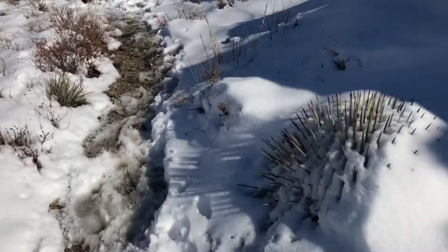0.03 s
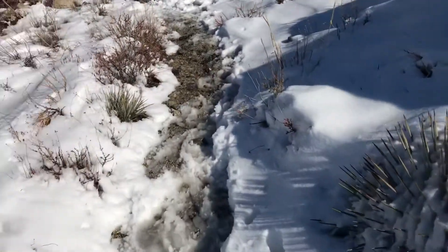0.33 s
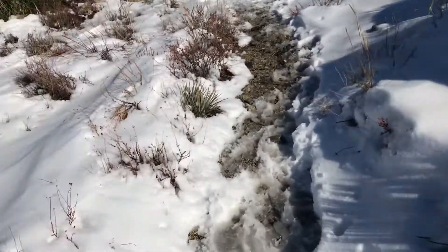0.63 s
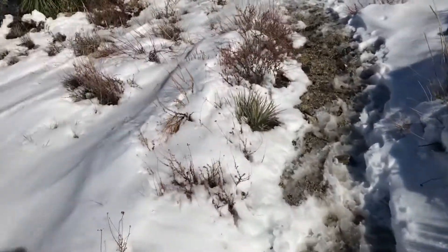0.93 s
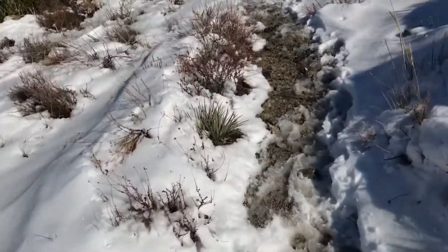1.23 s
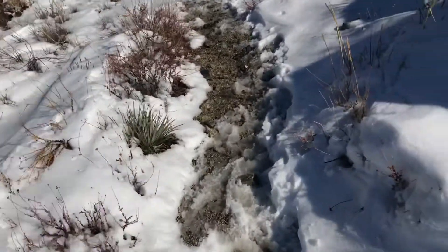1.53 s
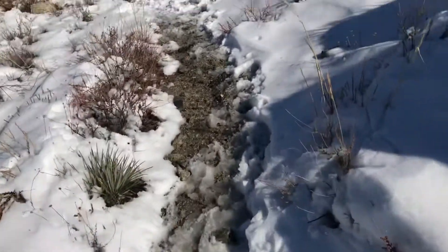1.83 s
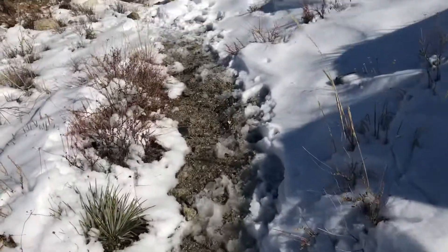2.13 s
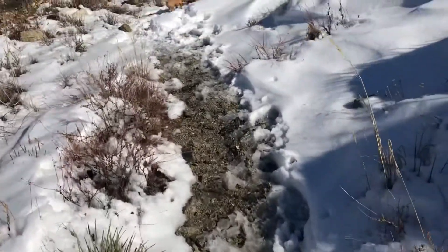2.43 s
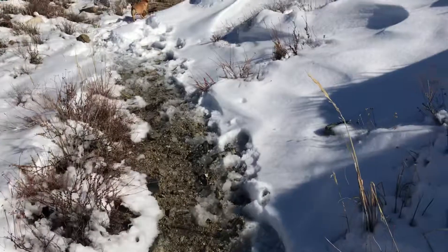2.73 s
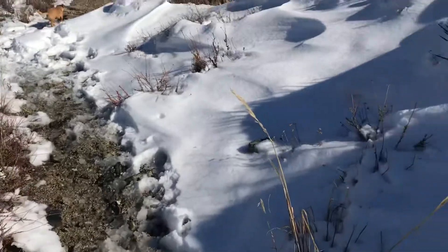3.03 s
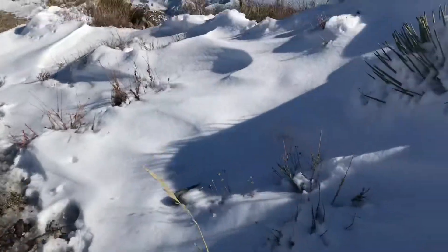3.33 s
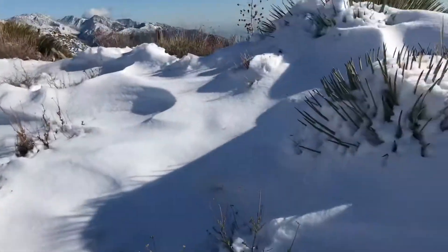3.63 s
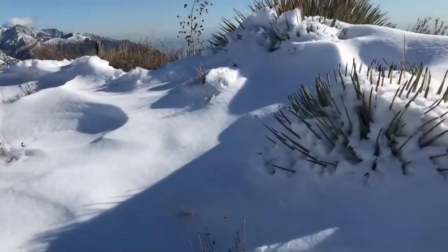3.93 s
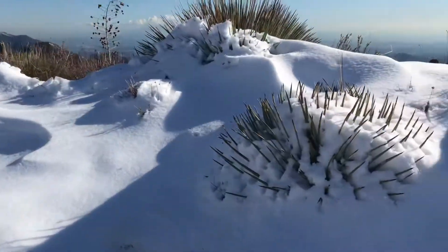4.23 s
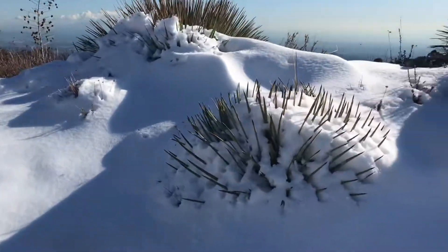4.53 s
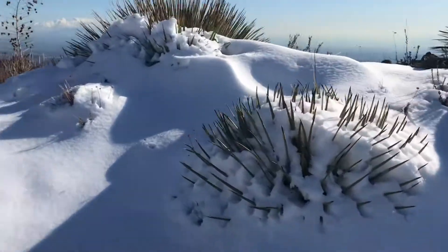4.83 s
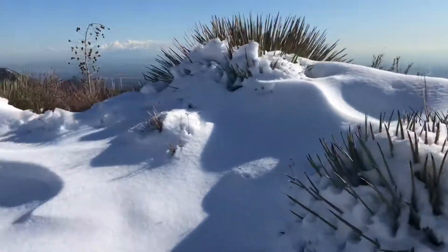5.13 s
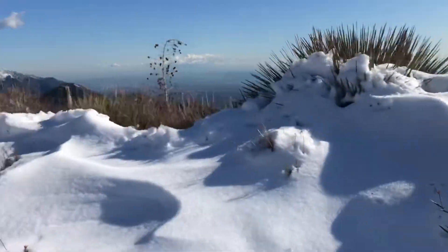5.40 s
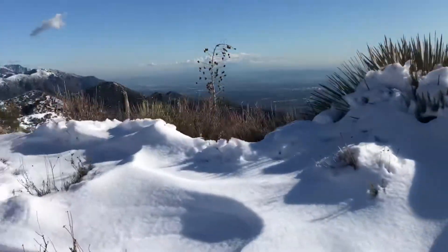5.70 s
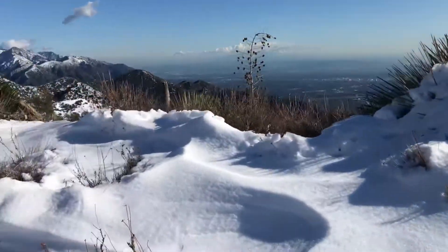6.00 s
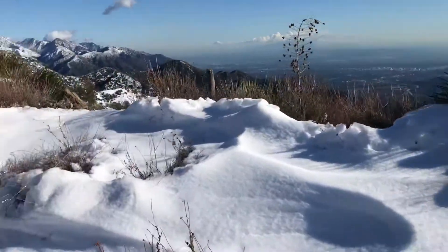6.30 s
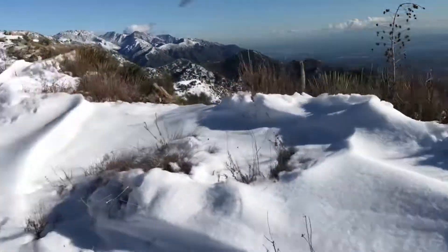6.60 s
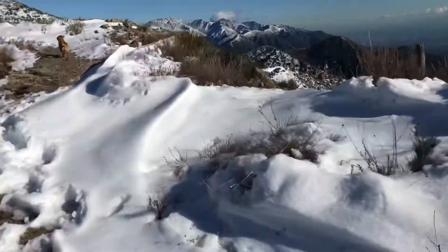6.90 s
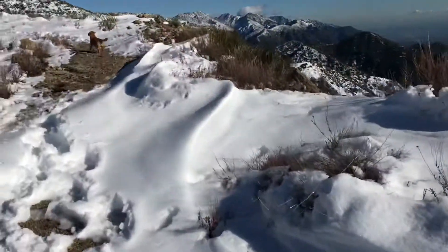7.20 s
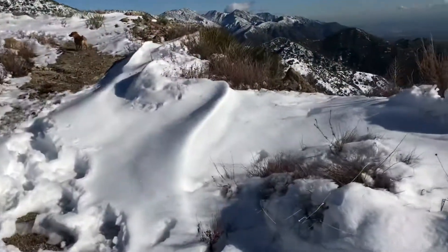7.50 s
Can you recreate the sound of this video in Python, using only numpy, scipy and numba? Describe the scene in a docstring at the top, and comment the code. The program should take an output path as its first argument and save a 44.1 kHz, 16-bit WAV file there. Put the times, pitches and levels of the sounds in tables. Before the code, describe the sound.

Footsteps crunch through slush and snow at a steady walk, while gusts of wind rumble on the microphone midway.

```python
"""A boot squashes into wet slush, and a walker goes on along a thawing mountain trail into firmer snow.
Each step is a swarm of breaking ice grains, every fracture a damped oscillation; among them come sudden
collapses, single cracks of crust and the thud of the sole. Turbulent wind buffets the microphone,
hardest midway, over a faint outdoor hiss."""
import sys
import numpy as np
from scipy import signal
from scipy.fft import rfft, irfft, next_fast_len
from scipy.io import wavfile
from scipy.ndimage import uniform_filter1d, map_coordinates
from numba import njit

SR = 44100
rng = np.random.default_rng(int(sys.argv[2]) if len(sys.argv) > 2 else 0)


def transcribe(signal):
    """Save signal, clipped to [-1, 1], as a 16-bit WAV file at the path in sys.argv[1]."""
    frames = np.atleast_2d(signal).T
    limited = np.clip(frames, -1, 1)
    pcm = np.round(limited * 32767).astype(np.int16)
    wavfile.write(sys.argv[1], SR, pcm)


N = 341775
TIME = np.arange(N) / SR

# a boot lands and sinks: (time [s], hold [s], level [dB], sag over the hold [dB], relative clump level [dB],
# release [s], hollow under the sole [Hz], crystal squeak [Hz], grain size spread [dB], fine spray [dB])
FOOTFALLS = [(-0.02, 0.085, -35, 15, -0.5, 0.012, 900, 2400, 1, -2.5),
             (0.773, 0.13, -41, 6.5, -3, .009, 980, 2680, 0.5, -1),
             (1.529, 0.095, -32.5, 16.5, 0, 0.025, 1170, 4700, 2, -1.5),
             (2.291, 0.18, -48, -3.5, -1, 0.019, 920, 4320, 1, -1),
             (3.089, 0.13, -44.5, 6, 0.5, 0.055, 1100, 2230, -4.5, 0.5),
             (3.884, 0.19, -46, 14.5, 3.5, .02, 1200, 3300, 1.5, -2),
             (4.646, 0.23, -57, -5.5, 1, 0.041, 980, 3700, 1, -1),
             (5.402, 0.2, -57, 3, 6, .02, 920, 3730, 3, -3),
             (6.314, 0.14, -50, 10, 3, 0.085, 1240, 4160, 3, -6),
             (6.945, 0.16, -45, 16.5, 2, 0.09, 990, 3100, 2.5, -4.5),
             (7.634, 0.12, -44, 5.5, -0.5, .02, 1280, 4100, 3, -2)]
# the trailing boot flings loose snow:
# (time [s], hold [s], level [dB], sag over the hold [dB], relative clump level [dB], release [s])
BOOT_SCUFFS = [(0.131, 0.054, -52, -13.5, -1.5, 0.009), (0.248, 0.027, -60.5, -0.5, -29, 0.16),
               (1.001, 0.062, -48.5, 5, 0, 0.0098), (1.777, 0.039, -60, 3.5, -9, 0.14),
               (2.56, 0.035, -63.5, -11, -0.5, 0.0064), (3.834, 0.036, -51.5, 7, 8.5, 0.013),
               (4.108, .11, -61, 3.5, -7.5, 0.015), (4.971, 0.02, -58, -0.5, 4, 0.067),
               (5.635, 0.1, -56.5, -0.5, -8, 0.0066), (7.186, .075, -53, -1, -7, 0.019)]
# spectral envelopes of coarse, fine and finest snow grains: (frequency [Hz], gain [dB])
CLUMP_SPECTRUM = [(90, -9.5), (190, -2), (320, 1), (520, -5.5), (720, -2.5), (900, -3), (1150, -3.5),
                  (1500, -6.5), (2000, -11.5), (3200, -19)]
CRUNCH_SPECTRUM = [(1000, -25), (1800, -1), (2550, 5), (3300, 4.5), (3800, 5), (4500, 4), (5200, 1),
                   (6800, 2), (8500, -15.5), (12000, -34.5)]
SPRAY_SPECTRUM = [(5000, -19), (7500, -5.5), (9000, -2), (10400, -6.5), (12500, -0.5), (14000, -2),
                  (16000, -5)]
# the breeze between gusts: (time [s], level [dB])
BREEZE_LEVELS = [(0, -50), (.6, -62), (1.05, -58.5), (1.3, -67), (1.9, -65), (2.5, -57.5), (3.0, -53),
                 (3.65, -50), (3.95, -35.5), (4.5, -29), (4.73, -46), (5.3, -39.5), (5.55, -50),
                 (5.9, -48.5), (6.08, -56.5), (6.5, -52), (7.1, -46), (7.74, -56)]
# gusts swell and pass: (time of the crest [s], level [dB], decay time [s])
WIND_GUSTS = [(2.641, -43.5, 0.036), (2.848, -37.5, 0.016), (2.974, -45.5, 0.036), (3.1, -27.5, 0.033),
              (3.251, -29, 0.023), (3.411, -34.5, 0.012), (3.493, -40, 0.031), (3.833, -21.5, 0.044),
              (4.127, -22, 0.028), (4.225, -21, 0.021), (4.383, -26, 0.035), (4.969, -33.5, 0.027),
              (5.468, -41, 0.034), (5.679, -36, 0.035), (6.676, -35, 0.029), (6.879, -40, 0.027),
              (7.008, -36, 0.019), (7.19, -36, 0.016), (7.288, -36.5, 0.032)]
# spectral envelopes of wind noise and outdoor hiss: (frequency [Hz], gain [dB])
RUMBLE_SPECTRUM = [(18, -35.5), (30, -7.5), (42, 1.5), (70, 3.5), (125, -8), (180, -17.5), (300, -36)]
EDDY_SPECTRUM = [(80, -15), (150, 3.5), (230, -13.5), (330, -13), (500, -30.5), (900, -46), (2000, -61)]
FLUTTER_SPECTRUM = [(250, 7.5), (380, 8), (600, -6.5), (900, -33.5), (1600, -58)]
HISS_SPECTRUM = [(60, 6), (250, 15), (600, 2), (1100, 3), (1700, -1.5), (3000, -0.5), (4400, -3),
                 (5100, -4.5), (6500, -5.5), (10400, -9), (12500, -5), (16000, -6.5)]
# faint outdoor hiss: (time [s], level [dB])
HISS_LEVELS = [(0.43, -61.5), (1.16, -62), (2.2, -60.5), (2.7, -61.5), (2.97, -58.5), (3.55, -65.5),
               (3.75, -62), (4.5, -70), (5.3, -63.5), (5.85, -61.5), (6.2, -62), (6.85, -60), (7.56, -63)]
# single snaps of crust and grit: (time [s], level [dB], frequency [Hz])
CRUST_CRACKS = [(0.244, -38.5, 474), (1.707, -38, 465), (2.011, -35, 1000), (2.04, -21, 850),
                (2.061, -25.5, 2980), (2.735, -38.5, 543), (2.794, -28.5, 1090), (2.836, -29, 620),
                (2.981, -39, 594), (3.274, -35, 470), (5.482, -34, 1220), (5.518, -26, 1310),
                (6.325, -19, 1310), (6.345, -20, 1100), (6.353, -19, 1060), (6.579, -32.5, 2030),
                (6.658, -26.5, 1800), (7.003, -27.5, 1030), (7.056, -24, 920), (7.069, -39, 1020),
                (7.108, -19.5, 1000), (7.244, -24.5, 1030)]
# the snow gives way at once: (time [s], level [dB], clump gain [dB], time scale [s])
SNOW_COLLAPSES = [(0.635, -52.5, -8.5, 0.0063), (0.744, -41.5, -10, 0.0027), (0.781, -39, -35, .009),
                  (0.799, -34, -14, .0063), (0.837, -29.5, -8.5, 0.0084), (0.999, -39, -9, 0.0033),
                  (1.5363, -19.5, -37, 0.0029), (1.617, -37.5, -29, 0.013), (1.732, -48.5, -1.5, 0.0063),
                  (1.7484, -42.5, -6, 0.0019), (2.0395, -42, -8, 0.0049), (2.317, -38.5, -34, 0.019),
                  (2.3918, -32, -3, 0.0046), (2.539, -47.5, -.5, 0.0047), (2.7948, -48.5, 2, 0.0077),
                  (3.0944, -39, -10, 0.0034), (3.165, -39.5, -0.5, 0.027), (3.656, -56, -9, 0.0077),
                  (3.814, -47, -11, .0018), (3.8376, -27, -6.5, .002), (3.937, -44.5, 5, 0.0083),
                  (4.02, -33, -11.5, 0.0089), (4.034, -38.5, -1, 0.011), (4.698, -44.5, -11, 0.014),
                  (4.751, -39, -13, 0.0023), (4.765, -32.5, -19, 0.0089), (5, -41.5, 4.5, 0.0053),
                  (5.4523, -36.5, 1, 0.0037), (5.5945, -38, -25, 0.011), (6.324, -31.5, 1.5, 0.0014),
                  (6.344, -47.5, 7.5, 0.0053), (6.543, -54.5, -8, 0.0078), (6.948, -38.5, -15, 0.0014),
                  (7.091, -38, -14, 0.0037), (7.406, -44, -7, 0.0054), (7.487, -51, -6, 0.0059),
                  (7.639, -56.5, 16, 0.0062)]
# the sole meets firm ground: (time [s], level [dB], frequency [Hz])
SOLE_THUDS = [(1.5325, -19.5, 149), (2.036, -33, 248.4), (6.321, -34, 300), (6.353, -32, 327),
              (6.952, -25, 260), (6.961, -25, 322), (7.634, -32, 292)]
# eddies strike the microphone: (time [s], level [dB], flutter gain [dB], deep push gain [dB])
EDDY_IMPACTS = [(3.061, -33, -26, 11.5), (3.107, -42, -3, 6), (3.774, -20, -12, -18), (3.837, -26, -9.5, 7),
                (3.861, -17.5, -23, 3), (3.904, -30, -24, 15.5), (4.064, -20, -14.5, 7.5),
                (4.081, -46, -7, 9), (4.106, -42, -3, -1), (4.13, -39.5, -21, 23), (4.208, -26.5, -34, 10),
                (4.231, -37, -14, 4), (4.376, -23, -28, -9), (4.394, -18, -36, 5.5),
                (4.411, -12.5, -37, -11), (4.522, -27.5, -2, -22), (4.593, -34.5, -6, -20),
                (4.936, -28, -18, -11), (5.672, -34, -44, 10), (6.566, -49.5, 4, -7)]


def undb(db):
    """Amplitude ratio of a level in decibels."""
    return 10 ** (np.asarray(db) / 20)


def level_curve(table):
    """Level in dB, interpolated linearly in time."""
    return np.interp(TIME, *np.transpose(table))


def colour(x, spectrum):
    """Spectral shaping with skirts of 12 dB per octave beyond the envelope's ends; the result has rms 1."""
    hz, db = np.transpose(spectrum)
    size = next_fast_len(N)
    f = np.maximum(np.arange(size // 2 + 1) * SR / size, 1)
    skirts = np.minimum(f / hz[0], 1) ** 2 * np.minimum(hz[-1] / f, 1) ** 2
    gain = undb(np.interp(np.log(f), np.log(hz), db))
    shaped = irfft(rfft(x, size) * skirts * gain, size)[:N]
    return shaped / np.sqrt(np.mean(shaped ** 2))


def noise(spectrum):
    """Filtered Gaussian noise of rms 1."""
    return colour(rng.standard_normal(N), spectrum)


def steady(x, seconds):
    """Division by the running rms evens out slow swells and keeps the finer grain."""
    size = max(int(seconds * SR), 2)
    power = uniform_filter1d(uniform_filter1d(x * x, size), size)
    return x / np.sqrt(np.abs(power) + 1e-9)


def add(out, s, sound):
    """Superpose a sound from time s."""
    start = int(s * SR)
    lo, hi = max(start, 0), min(start + len(sound), N)
    if hi > lo:
        out[lo:hi] += sound[lo - start:hi - start]


@njit
def rings(starts, hz, cycles, sizes):
    """Damped free oscillations, each decaying by 50 dB within its number of cycles."""
    out = np.zeros(N)
    for k in range(len(starts)):
        length = cycles[k] * SR / hz[k]
        phasor = sizes[k] + 0j
        pole = np.exp(2j * np.pi * hz[k] / SR - 5.76 / length)
        first = max(int(starts[k] * SR), 0)
        for i in range(first, min(first + int(length), N)):
            phasor *= pole
            out[i] += phasor.imag
    return out


def grains(count, low_hz, high_hz, cycles, spread_db):
    """Shot noise of fracture: grains ring at random times and pitches, a few far louder than the rest."""
    when, pitch, ring, size = rng.random((count, 4)).T
    hz = low_hz * (high_hz / low_hz) ** pitch
    rank = np.minimum(-np.log(1 - size), 4.5)  # capped exponential distribution
    sizes = undb(rank * spread_db[(when * N).astype(int)]) * rng.choice([-1, 1], count)
    return rings(when * N / SR, hz, cycles * (.5 + ring), sizes * hz / high_hz)


def snow_state(loosen_s=0.21):
    """Grain statistics (size spread, spray) in dB: snow loosened by a step breaks unevenly and duller."""
    s, *_, spread_db, spray_db = np.transpose(FOOTFALLS)
    step = np.maximum(np.searchsorted(s - .05, TIME) - 1, 0)
    loose = np.clip((TIME - s[step]) / loosen_s, 0, 1)
    return spread_db[step] + loose, spray_db[step] - 2 * loose


def ground_echoes(x):
    """Comb filtering: faint reflections off ground and legs shift in delay as the walker moves."""
    out = x.copy()
    for lag_s in (.0007, .0019, .0034):
        stride = np.interp(TIME, np.linspace(0, TIME[-1], 20), rng.uniform(-0.983, 1, 20))
        lag = lag_s * (1 + .5 * stride)
        out += .17 * map_coordinates(x, [(TIME - lag) * SR], order=3)
    return out


def snow_textures():
    """Smaller grains ring higher: coarse clumps, and fine crystals whose spray brightens in wet slush."""
    spread_db, spray_db = snow_state()
    clumps = colour(grains(17000, 126, 3155, cycles=7.3, spread_db=1.77 * spread_db), CLUMP_SPECTRUM)
    crunch = colour(grains(44000, 1268, 10630, cycles=19, spread_db=spread_db), CRUNCH_SPECTRUM)
    spray = colour(grains(55000, 5500, 18000, cycles=23, spread_db=spread_db), SPRAY_SPECTRUM)
    crystals = steady(crunch, 0.018) + undb(spray_db) * steady(spray, .02)
    return steady(ground_echoes(clumps), 0.011), ground_echoes(crystals)


def press(s, hold_s, db, sag_db, release_s, attack_s=0.012):
    """Amplitude envelope of a boot's load: quick attack, sloping hold, nearly exponential release."""
    age = TIME - s
    attack = np.exp(-(np.maximum(-age, 0) / attack_s) ** 1.9)
    release = np.exp(-(np.maximum(age - hold_s, 0) / release_s) ** 1.01)
    return undb(db - sag_db * np.clip(age / hold_s, 0, 1)) * attack * release


def resonate(x, hz, q, db):
    """A second-order resonance reinforces one band of the sound."""
    return x + undb(db) * signal.lfilter(*signal.iirpeak(hz, q, fs=SR), x)


def treads(clumps, crystals, packing_db_per_s=32):
    """Amplitude modulation of grain noise: boots press and scuff in small jerks that all grains share."""
    out = np.zeros(N)
    for s, hold_s, db, sag_db, coarse_db, release_s, hollow_hz, squeak_hz, _, _ in FOOTFALLS:
        push = press(s, hold_s, db, sag_db, release_s)
        settle = press(s, hold_s, db - 29, sag_db=0, release_s=0.15)  # snow trickles into the print
        packing = undb(packing_db_per_s * np.clip(TIME - s, 0, hold_s))  # clumps grow as the boot sinks
        squeak = resonate(crystals, squeak_hz, q=13, db=-6.5)
        hollow = resonate(clumps, hollow_hz, q=4.5, db=-4)
        out += (push + settle) * squeak
        out += undb(coarse_db) * (push * packing + settle) * hollow
    for s, hold_s, db, sag_db, coarse_db, release_s in BOOT_SCUFFS:
        out += press(s, hold_s, db, sag_db, release_s) * (crystals + undb(coarse_db) * clumps)
    jerks = noise([(25, 9.5), (70, -2), (150, -21.5)])
    spread_db, _ = snow_state()
    return undb(0.65 * spread_db * jerks) * out


def wind_level(lull_db=3.5, rise_ratio=0.93):
    """Incoherent sources add in power: the level in dB of a wavering breeze plus its gusts."""
    lulls = np.tanh(noise([(4, 2), (9, -11), (14, -31)]))
    power = undb(level_curve(BREEZE_LEVELS) + lull_db * lulls) ** 2
    for s, db, decay_s in WIND_GUSTS:
        age = (TIME - s) / decay_s
        power += undb(db) ** 2 * np.exp(-(age / np.where(age < 0, rise_ratio, 1)) ** 2)
    return 10 * np.log10(power)


def wind(rumble_db=-1, eddy_db=-13, growth=0.64, puff_db=5):
    """Turbulent pressure rumbles on the microphone; faster eddies come in puffs and grow with the gust."""
    level_db = wind_level()
    rumble = steady(noise(RUMBLE_SPECTRUM), 0.073)
    eddies = steady(noise(EDDY_SPECTRUM), 0.032)
    puffs = noise([(6, -2), (18, -4), (40, -14.5)])
    turbulence_db = eddy_db + growth * (level_db - level_db.max()) + puff_db * puffs
    return undb(level_db) * (undb(rumble_db) * rumble + undb(turbulence_db) * eddies)


def air(tick_db=-3.5):
    """Ambient noise floor: a faint broadband hiss with soft ticks of loose snow and grit."""
    waver_db = .7 * noise([(2, 2), (6, 1.5), (15, -20)])
    hiss = noise(HISS_SPECTRUM) * undb(waver_db)
    ticks = grains(1100, 250, 6000, cycles=7.8, spread_db=np.full(N, 3.))
    ticks = colour(ticks, [(250, 13), (1100, 1.5), (2000, -8), (7000, -15)])
    return undb(level_curve(HISS_LEVELS)) * (hiss + undb(tick_db) * steady(ticks, 0.3))


def pulse(hz, db, cycles):
    """A pressure transient: the derivative of a sine burst whose envelope crests after the given cycles."""
    turns = TIME[:SR // 8] * hz
    age = turns / cycles
    envelope = age ** 2 * np.exp(2 - 2 * age)
    wave = np.gradient(envelope * np.sin(2 * np.pi * turns))
    return undb(db) * wave / np.abs(wave).max()


def cracks(gain_db=-8.5, cycles=0.79, edge_db=-8.5, edge_hz=3120):
    """Brittle fracture: a piece of crust snaps with a few cycles of its own pitch and a brighter edge."""
    out = np.zeros(N)
    for s, db, hz in CRUST_CRACKS:
        edge = pulse(edge_hz, db + gain_db + edge_db, 2 * cycles)
        add(out, s, pulse(hz, db + gain_db, cycles) + edge)
    return out


def collapses(clumps, crystals, clump_db=3.5, crystal_db=-2, rise=0.4, fall=0.78):
    """Cascading failure: a pocket of snow caves in, and a short avalanche of grains swells and dies."""
    out = np.zeros(N)
    clumps, crystals = steady(clumps, 0.0022), steady(crystals, 0.0042)
    for s, db, coarse_db, scale_s in SNOW_COLLAPSES:
        on = slice(int((s - .04) * SR), int((s + .04) * SR))
        age = (TIME[on] - s) / scale_s
        swell = np.exp(1 - np.sqrt(1 + (age / np.where(age < 0, rise, fall)) ** 2))
        debris = undb(crystal_db) * crystals[on] + undb(coarse_db + clump_db) * clumps[on]
        out[on] += undb(db) * swell * debris
    return out


def thuds():
    """Heavily damped impact: the sole meets firm ground with a short, dull knock."""
    out = np.zeros(N)
    for s, db, hz in SOLE_THUDS:
        add(out, s - .001, pulse(hz, db, cycles=.55))
    return out


def buffets(slap_hz=183.7, push_hz=100.7, flutter_s=0.0065):
    """Dynamic pressure: an eddy slaps the microphone, shoves the air behind it and breaks into flutter."""
    out = np.zeros(N)
    flutter = steady(noise(FLUTTER_SPECTRUM), 0.0083)
    for s, db, flutter_db, push_db in EDDY_IMPACTS:
        add(out, s - .001, pulse(slap_hz, db - 2.5, cycles=0.67))
        add(out, s - .003, pulse(push_hz, db + push_db - 4, cycles=0.95))
        on = slice(int((s - .03) * SR), int((s + .04) * SR))
        breakup = np.exp(-((TIME[on] - s - .004) / flutter_s) ** 2)
        out[on] += undb(db + flutter_db - 1.5) * flutter[on] * breakup
    return out


def scene():
    """Superposition of boots, wind and open air; absorbent snow gives no reverberation."""
    snow = snow_textures()
    boots = treads(*snow) + cracks() + collapses(*snow) + thuds()
    return (boots + wind() + buffets() + air())[None]


def record(dry):
    """Band limiting: a steep elliptic low-pass removes the treble above 15.9 kHz."""
    return signal.sosfilt(signal.ellip(10, .2, 80, 15900, fs=SR, output="sos"), dry)


dry = scene()
out = record(dry)
transcribe(out)
```